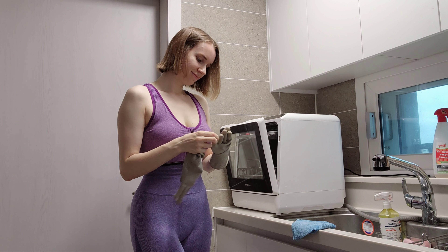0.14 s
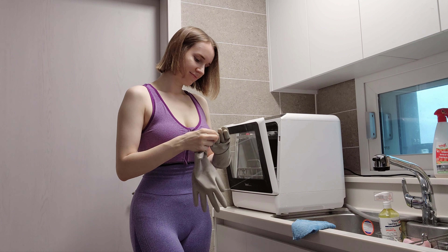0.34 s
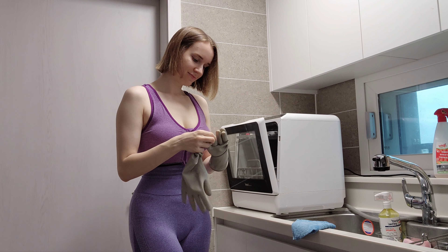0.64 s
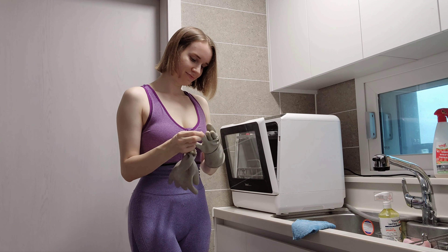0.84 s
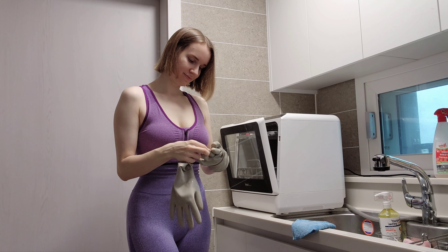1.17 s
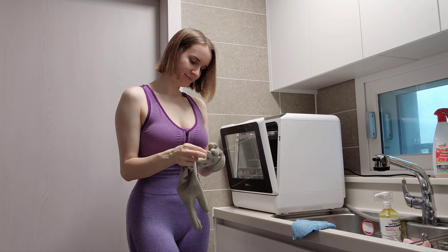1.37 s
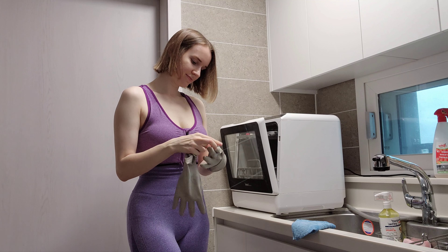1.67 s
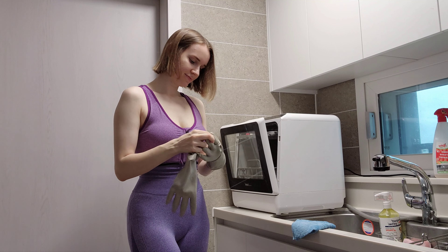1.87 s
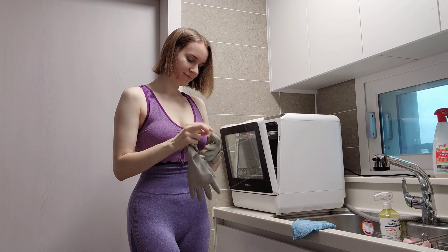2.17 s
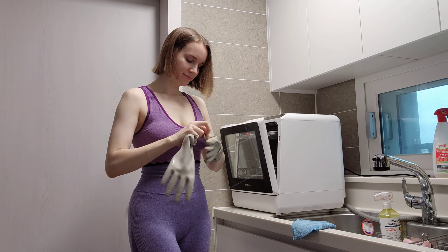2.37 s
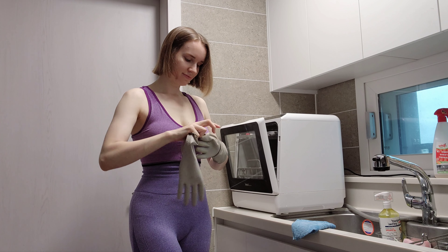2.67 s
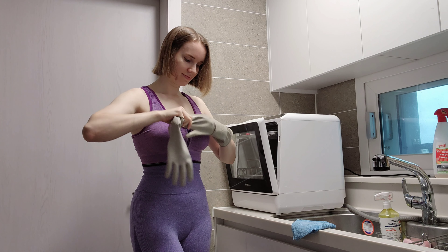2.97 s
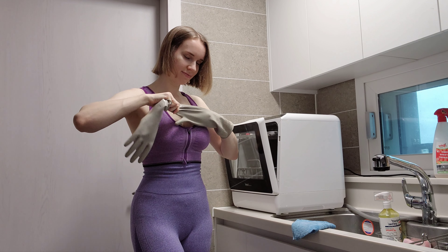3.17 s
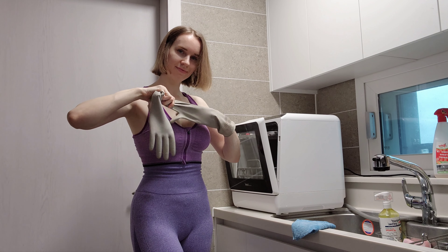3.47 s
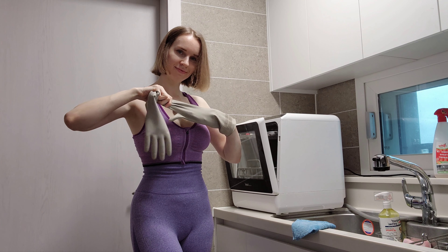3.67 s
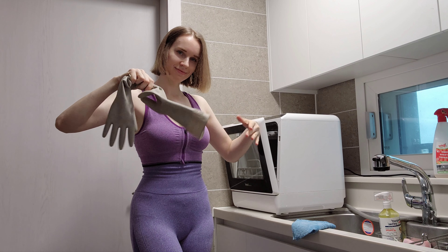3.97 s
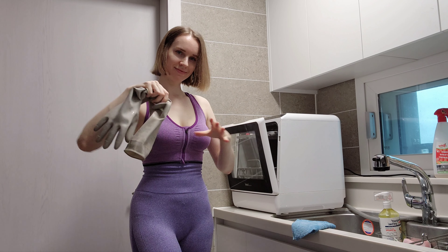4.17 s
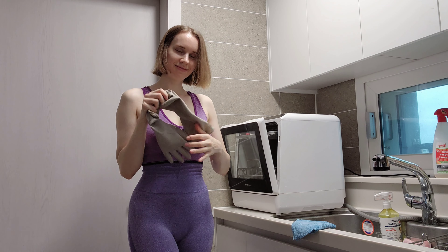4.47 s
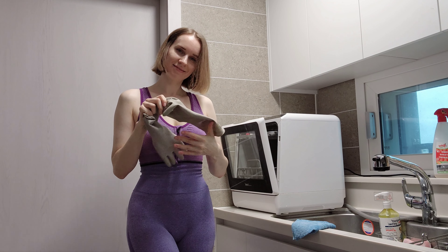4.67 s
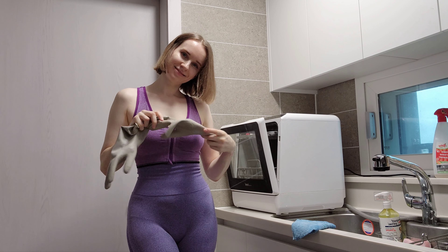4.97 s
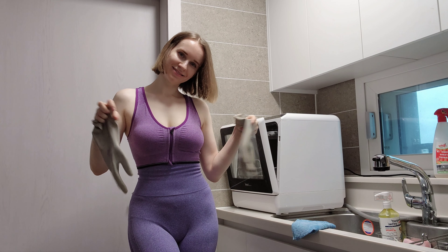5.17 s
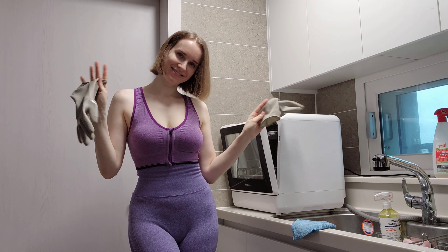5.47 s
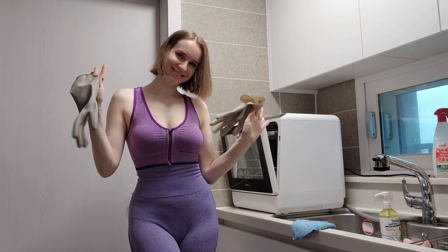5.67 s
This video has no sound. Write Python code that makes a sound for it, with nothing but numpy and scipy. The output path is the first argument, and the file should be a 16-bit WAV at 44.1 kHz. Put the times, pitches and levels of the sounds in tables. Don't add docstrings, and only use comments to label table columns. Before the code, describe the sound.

Close rubbery squeaky pops, slaps and rustles of gloves being pulled off and shaken, above a soft low room hum.

```python
import sys
import numpy as np
from scipy import signal
from scipy.io import wavfile
from scipy.ndimage import uniform_filter1d

SR = 44100
rng = np.random.default_rng(int(sys.argv[2]) if len(sys.argv) > 2 else 0)


def ratio_of_db(decibels):
    return 10 ** (np.asarray(decibels, float) / 20)


def bounce(signal):
    frames = np.transpose(np.atleast_2d(signal))
    limited = np.clip(frames, -1, 1)
    pcm = np.round(limited * 32767).astype(np.int16)
    wavfile.write(sys.argv[1], SR, pcm)


N = 257535


def evened(x):
    return x / np.sqrt(np.mean(x ** 2) + 1e-30)


def curve(rows, order=1):
    rows = np.transpose(rows)
    return np.interp(np.arange(N) / SR, rows[0], rows[order])


def read(points, hz):
    f, value = np.transpose(points)
    return np.interp(np.log(hz + 1), np.log(f + 1), value)


def resonate(x, hz, width_hz):
    return signal.lfilter(*signal.iirpeak(hz, hz / max(width_hz, 1), SR), x)


def colour(x, points):
    level_db = np.maximum(read(points, abs(np.fft.fftfreq(4096, 1 / SR))), -100)
    log_gain = np.log(ratio_of_db(level_db))
    taps = np.fft.ifft(np.exp(log_gain - 1j * signal.hilbert(log_gain).imag)).real[:2048]
    return signal.oaconvolve(x, taps / np.linalg.norm(taps))[:N]


def add(mix, start, sound):
    mix[:, start:start + sound.shape[1]] += sound


def air():
    # frequency in Hz, level in dB per Hz.
    room_db = [(65, -44.5), (110, -2.5), (125, -17), (223, -10.5), (281, -17.5), (361, -33.5), (384, -58.5),
               (703, -43), (865, -33), (1000, -40), (5760, -67.5), (6530, -74), (6950, -77), (16000, -63.5)]
    # frequency in Hz, left-right likeness [0..1].
    likeness = [(30, 0.44), (130, 1), (300, 0.61), (1000, 0.39), (3000, .2), (16000, .1)]
    level_db = -60.5
    frames, hz = N // 256 + 5, np.fft.rfftfreq(1024, 1 / SR)
    a, b, c, d, patches = rng.standard_normal((frames, 513, 5)).T
    patches = evened(uniform_filter1d(uniform_filter1d(patches, 8, 0), 14, 1))
    same = np.clip(read(likeness, hz), -1, 1)[:, None]
    left = a + 1j * b
    right = same * left + np.sqrt(1 - same ** 2) * (c + 1j * d)
    z = np.array([left, right]) * ratio_of_db(read(room_db, hz)[:, None] + 1.6 * patches)
    return ratio_of_db(level_db) * evened(signal.istft(z, nperseg=1024, noverlap=768)[1][:, :N])


def rumble():
    # frequency in Hz, width in Hz, level in dB.
    room_modes = [(35.6, 3.3, -73), (55.3, 13.6, -53), (72.04, 10.6, -44), (89.8, 5.94, -46),
                  (106.1, 14.1, -46), (127.8, 33, -70)]
    # time in seconds, level in dB.
    swell = [(0.0, -47), (0.32, -45.5), (2.37, -46), (2.44, -42.5), (2.67, -46.5), (2.85, -40),
             (3.27, -51.5), (3.56, -44.5), (5.79, -45.5), (5.84, -50)]
    side_db = -23.5
    push = rng.standard_normal((2, N))
    modes = np.zeros((2, N))
    for hz, width_hz, db in room_modes:
        once = resonate(push, hz, 1.17 * width_hz)
        modes += ratio_of_db(db) * evened(resonate(once, hz, 1.17 * width_hz))
    return (modes[0] + ratio_of_db(side_db) * np.outer([1, -1], modes[1])) * ratio_of_db(curve(swell) + 42)


def whine():
    # time in seconds, level in dB.
    whine_db = [(0, -102), (.25, -99), (.6, -93), (1.9, -98), (2.1, -104), (5.84, -104)]
    tone_hz, width_hz = 6330, 50
    return ratio_of_db(curve(whine_db)) * evened(resonate(rng.standard_normal(N), tone_hz, width_hz))


def crackle(per_s, spread_db, hiss):
    size = ratio_of_db(spread_db * np.minimum(rng.exponential(1, N), 5)) * rng.choice([-1., 1.], N)
    clicks = evened(size * (rng.random(N) < per_s / SR))
    return evened(clicks + hiss * rng.standard_normal(N))


def clumps(per_s, depth_db):
    lowpass = signal.butter(2, per_s, fs=SR, output="sos")
    chance = signal.sosfilt(lowpass, rng.standard_normal(N))
    return ratio_of_db(depth_db * evened(chance))


def sagging(x, t, hz, width_hz, sag_per_s):
    note_hz = hz * (1 - sag_per_s * np.clip(t, 0, .1))
    turn = np.exp(2j * np.pi * np.cumsum(note_hz) / SR)
    r = np.exp(-np.pi * width_hz / SR)
    return (turn * signal.lfilter([(1 - r) ** 2], [1, -2 * r, r * r], x / turn)).real


def patchy(x, patchy_db):
    z = signal.stft(x, nperseg=256)[2]
    noise = rng.standard_normal(z.shape[::-1]).T
    patches = uniform_filter1d(uniform_filter1d(noise, 5, 0), 7, 1)
    return signal.istft(z * ratio_of_db(patchy_db * evened(patches) - patchy_db), nperseg=256)[1][:N]


def glove_moves():
    # start in seconds, peak in dB, glove hollow in Hz, crackle in dB, length in seconds.
    taut_slips = [(0.002, -37.5, 1335, -6, 0.0064), (0.788, -49.5, 1470, -9.5, 0.028),
                  (0.92, -71, 1250, -2, 0.014), (1.44, -67.5, 2110, -20.5, 0.054),
                  (1.842, -64, 1280, -13.5, 0.024), (1.924, -54, 1190, -9, 0.07),
                  (1.95, -26.5, 1265, -11, 0.01), (2.396, -63, 1240, -17, 0.16),
                  (2.569, -52, 1170, -10, 0.033), (2.63, -50.5, 1300, -19.5, 0.014),
                  (2.661, -45, 1330, -18, 0.02), (2.771, -60.5, 1050, -22, 0.024),
                  (3.017, -41.5, 866, -15.5, 0.0077), (3.586, -51, 1170, -19, 0.018),
                  (3.682, -55.5, 980, -31, 0.035), (4.179, -52, 1000, -11, 0.017),
                  (4.392, -68.5, 1010, 2, 0.01), (4.565, -47.5, 800, -8, 0.0032),
                  (4.902, -56.5, 1280, -35, 0.023), (5.013, -53, 1150, -22, 0.032),
                  (5.05, -71, 1000, 2.5, 0.011), (5.285, -80.5, 759, 8, 0.075),
                  (5.655, -42, 1000, -14.5, 0.004)]
    slaps = [(0.127, -46.5, 1820, -24.5, 0.013), (0.712, -63, 2280, -6, 0.063),
             (0.996, -50, 1670, -23, 0.027), (1.267, -69, 1040, 0.5, 0.18), (1.54, -35, 2026, -23, 0.019),
             (2.176, -47.5, 1810, -24, 0.029), (2.341, -53.5, 1430, -9.5, 0.013),
             (3.296, -45, 886, -17, 0.013), (3.443, -48.5, 1194, -11.5, 0.0072),
             (3.762, -39.5, 1300, -6, 0.0073), (3.787, -34, 1150, -20, 0.017),
             (4.28, -39.5, 1020, -27.5, 0.009), (4.459, -53, 1280, -12, 0.029),
             (4.478, -45, 1060, -14, 0.01), (5.156, -51, 1140, -8.5, 0.0088),
             (5.629, -66.5, 2000, 11, 0.012), (5.718, -62, 1020, -5, 0.011),
             (5.759, -44, 1780, -15.5, 0.014), (5.783, -55, 406, -41, 0.029)]
    loose_slips = [(0.214, -77, 907, 0.5, 0.018), (0.328, -72, 890, 3.5, 0.022),
                   (0.679, -72, 1500, -8.5, 0.05), (0.751, -47, 1240, -7, 0.016),
                   (1.325, -41, 1210, -6, 0.015), (1.52, -51, 860, -23, 0.011),
                   (2.602, -52, 1280, -19, 0.0096), (2.808, -62.5, 786, -13, 0.034),
                   (2.974, -63, 915, -4, 0.031), (3.025, -43.5, 1270, -22, 0.021),
                   (3.8, -37, 870, -4, 0.029), (3.828, -32, 840, -38, 0.0093),
                   (3.855, -32.5, 1055, -20.5, 0.012), (3.892, -48, 1030, -21, 0.021),
                   (4.111, -62, 1070, 0, 0.025), (4.192, -45, 960, -21, 0.013),
                   (4.317, -61, 790, -8, 0.016), (4.523, -49.5, 1280, -12, 0.015),
                   (4.608, -56.5, 2020, -23, 0.034), (4.727, -55, 730, -41, 0.013),
                   (4.927, -49, 1036, -4.5, 0.017), (5.179, -47, 930, -13.5, 0.0061),
                   (5.326, -58.5, 940, -26, 0.01)]
    swell_share, slap_rise_s = 0.35, 0.0029
    moves = [(row, 2.15, 0.072, swell_share * row[4]) for row in loose_slips]
    moves += [(row, -3, 0.68, swell_share * row[4]) for row in taut_slips]
    moves += [(row, 3.6, 0.58, slap_rise_s) for row in slaps]
    return moves


def gloves():
    # time in seconds, hand effort in dB, dryness of the rubbing in dB.
    rustle = [(0.0, -68, -10), (0.29, -69.5, -11.5), (0.45, -73, -14.5), (0.88, -66.5, -13.5),
              (1.3, -73.5, -13), (1.6, -78, -1.5), (1.9, -63.5, -17), (2.1, -56, -21.5), (2.39, -70, -17.5),
              (2.52, -65, -9), (2.7, -70.5, -9), (3.37, -62, -23), (3.99, -59, -19.5), (4.3, -58, -18.5),
              (4.5, -64, -11.5), (4.96, -58.5, -10.5), (5.4, -66, -6), (5.84, -58, -16)]
    # frequency in Hz, level in dB per Hz.
    flap_colour = [(71, -28), (120, 1.5), (325, -3), (773, -1.5), (909, 1), (1180, -2.5), (1310, -7.5),
                   (1810, -12), (4000, -33), (5200, -59), (8800, -120)]
    # frequency in Hz, level in dB per Hz.
    skin_colour = [(1180, -23.5), (2000, 1.5), (2640, -4), (3010, -1), (4120, -1.5), (5030, -3.5),
                   (7510, -10), (10100, -21), (15200, -22.5), (16000, -25)]
    # frequency in Hz, level in dB per Hz.
    fizz_colour = [(7500, -27), (9000, 5.5), (12000, 2), (15500, 6)]
    settle_db, settle_s = -23, 0.05
    fizz_db, fizz_per_dry = -13.5, 1.6
    low, high, fine = crackle(1500, 3.43, 0.87), crackle(2500, 4.76, 0.47), crackle(5000, 2.9, .8)
    effort_db, dry_db = curve(rustle), curve(rustle, order=2)
    hollow = np.zeros(N)
    flap = ratio_of_db(effort_db - 9.5) * clumps(17, 2.4)
    skin = ratio_of_db(effort_db + dry_db) * clumps(25, 2.8)
    clock = np.arange(N) / SR
    for (s, db, hz, skin_db, length_s), flap_db, follow, rise_s in glove_moves():
        part = slice(max(round((s - .1) * SR), 0), round((s + .3) * SR))
        t = clock[part] - s
        force = np.exp(np.where(t < 0, t / max(rise_s, 1e-4), -(t / max(length_s, 1e-3)) ** 2))
        linger = force + .22 * (t > 0) * np.exp(-abs(t) / (2.2 * length_s))
        pop = sagging(linger * low[part], t, 1.03 * hz, .27 * hz, 1.6)
        hollow[part] += ratio_of_db(db - 9.) * pop * np.linalg.norm(force) / np.linalg.norm(pop)
        shake = force + ratio_of_db(settle_db) * (t > 0) * np.exp(-abs(t) / settle_s)
        flap[part] += ratio_of_db(db + flap_db + follow * skin_db - 5.5) * shake
        skin[part] += ratio_of_db(db + skin_db + 2.0) * shake
    fizz = ratio_of_db(effort_db + fizz_db + fizz_per_dry * dry_db) * clumps(20, 3.2)
    sheet = colour(flap * low, flap_colour)
    sheet += colour(skin * high, skin_colour)
    sheet += colour(fizz * fine, fizz_colour)
    return hollow, patchy(sheet, 1.8)


def tail():
    # frequency in Hz, t60 in seconds.
    tiles = [(200, 0.084), (800, 0.22), (2100, 0.23), (5500, 0.15), (14000, 0.13)]
    taps = np.zeros((2, SR // 2))
    at = np.arange(30, SR // 2 - 20, 20) + rng.integers(0, 20, (2, (SR // 2 - 31) // 20))
    np.put_along_axis(taps, at, rng.choice([-1., 1.], at.shape), 1)
    hz, t, z = signal.stft(taps, SR, nperseg=256)
    decay = ratio_of_db(-60 * t / read(tiles, hz)[:, None])
    echo = signal.istft(z * decay, SR, nperseg=256)[1]
    return echo / np.linalg.norm(echo[0])


def kitchen(x):
    # frequency in Hz, width in Hz, level in dB, left-right difference in dB.
    cabinets = [(221, 16, 4, 0), (295, 25, 4, 0), (420, 40, 2, 0), (545, 16, 5, 0), (909, 14, 9, -4),
                (1108, 14, 3, 2), (1300, 18, 11, -2), (3850, 20, 2, 0)]
    turn = 2 * np.pi * 1.3 * np.arange(N) / SR
    wet, rings = np.zeros((2, N)), np.zeros((2, N))
    for k in range(3):
        path = np.sqrt(2 / 3) * np.cos(turn + 2 * np.pi * k / 3)
        wet += signal.fftconvolve((x * path)[None], tail(), axes=1)[:, :N]
    for hz, width_hz, db, pan_db in cabinets:
        rings += ratio_of_db([[db + pan_db / 2], [db - pan_db / 2]]) * resonate(x, hz, width_hz)
    direct = np.array([x, np.roll(x, 2)])
    return (ratio_of_db(-8.) * direct + ratio_of_db(1.5) * wet + rings) * ratio_of_db([[-.8], [.8]])


def ticks():
    # start in seconds, peak in dB, frequency in Hz.
    folds = [(0.932, -66.5, 6620), (1.272, -54.5, 6560), (1.54, -65, 3580), (1.95, -51, 9000),
             (3.765, -59, 3900), (3.788, -36, 5050), (4.475, -51, 6940), (4.556, -67, 9000),
             (4.931, -46.5, 10200), (5.056, -67, 7800), (5.347, -55, 8700), (5.633, -49.5, 10400),
             (5.714, -47, 4950), (5.832, -59, 6760)]
    out, t = np.zeros((2, N)), np.arange(300) / SR
    for s, db, hz in folds:
        spit = rng.standard_normal((2, 300)) * np.exp(-t / .0016)
        add(out, round(s * SR), ratio_of_db(db) * resonate(spit, hz, 1.1 * hz))
    return out


def thuds():
    # start in seconds, peak in dB, length in seconds.
    hand_slaps = [
        (1.33, -57, 0.039),
        (1.948, -38, 0.031),
        (3.449, -52.5, 0.012),
    ]
    hz, width_hz, rise_s = 263, 720, 0.0072
    out, t = np.zeros((2, N)), np.arange(SR // 8) / SR
    for s, db, length_s in hand_slaps:
        push = rng.standard_normal(len(t)) * np.minimum(t / rise_s, 1) * np.exp(-t / length_s)
        dull = resonate(resonate(push, hz, width_hz), hz, width_hz)
        add(out, round(s * SR), ratio_of_db(db + 15.5) * dull * ratio_of_db([[-1.], [1.]]))
    return out


def scene():
    background = air() + rumble() + whine()
    pops, sheet = gloves()
    tick = ticks()
    straight = ratio_of_db(-2.5) * pops + ratio_of_db(-1.) * tick
    return kitchen(pops + sheet + tick[0]) + straight + background + thuds()


def top_cut(x):
    return signal.sosfilt(signal.butter(12, 16500, fs=SR, output="sos"), x)


def record(dry):
    lowpass = signal.firwin(511, 15900, window=("kaiser", 5), fs=SR)
    limited = signal.oaconvolve(dry, lowpass[None], "same")
    return top_cut(limited)


dry = scene()
out = record(dry)
bounce(out)
```